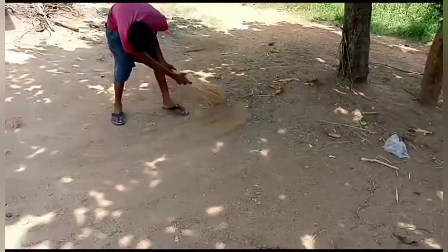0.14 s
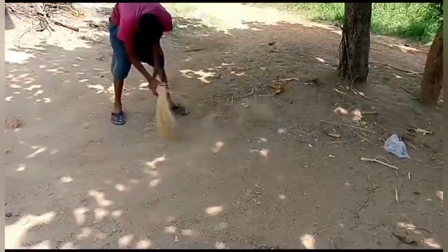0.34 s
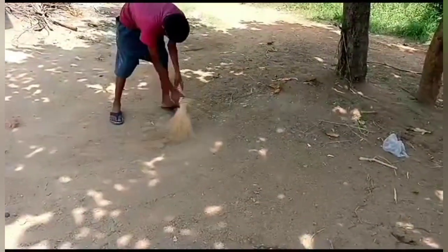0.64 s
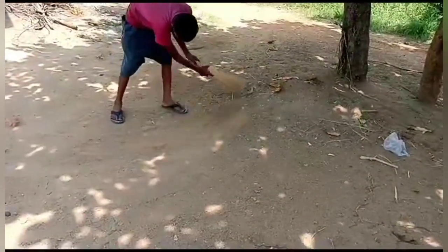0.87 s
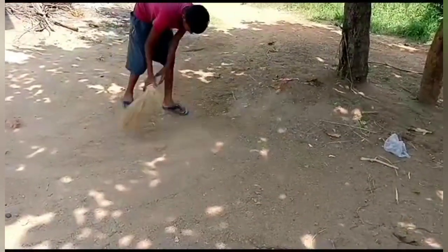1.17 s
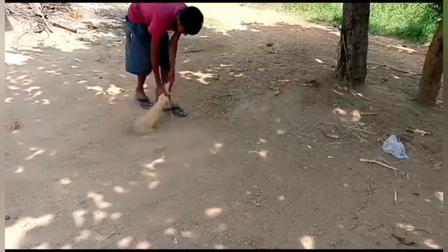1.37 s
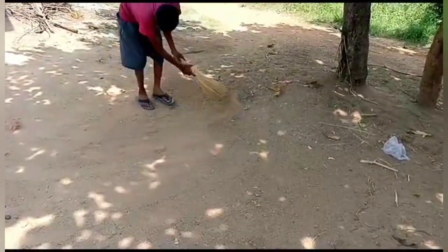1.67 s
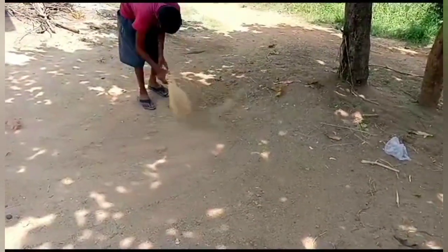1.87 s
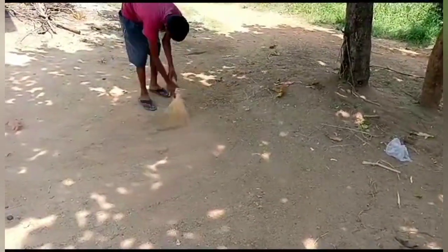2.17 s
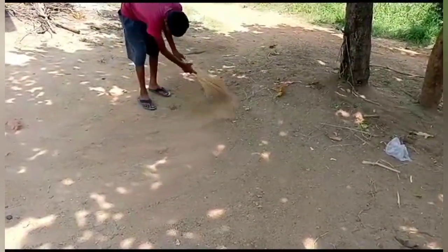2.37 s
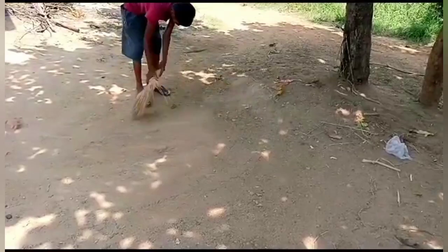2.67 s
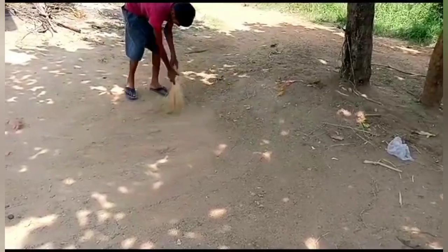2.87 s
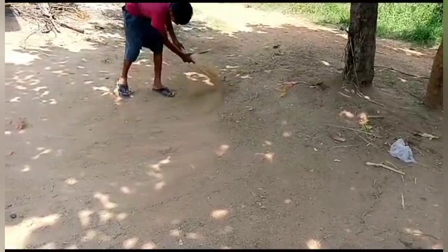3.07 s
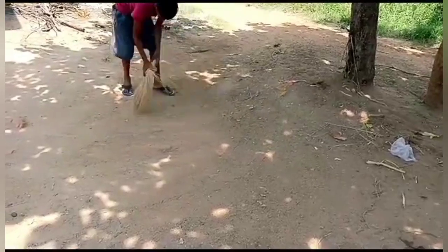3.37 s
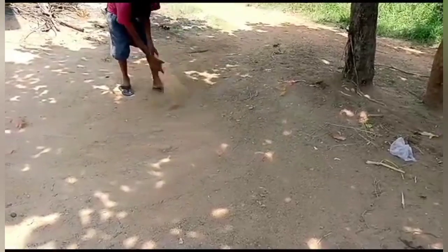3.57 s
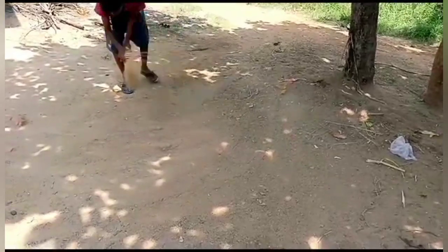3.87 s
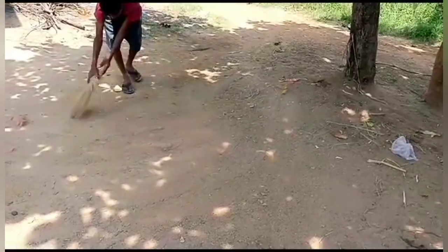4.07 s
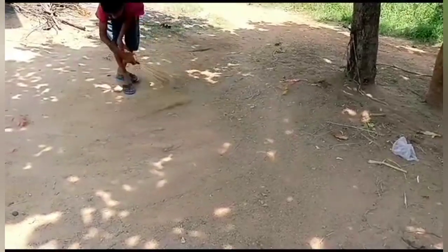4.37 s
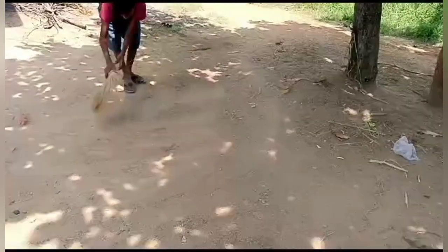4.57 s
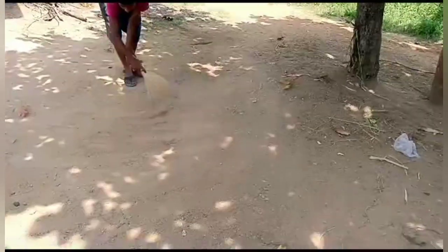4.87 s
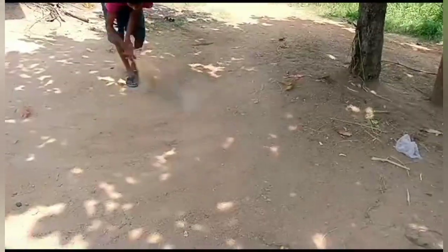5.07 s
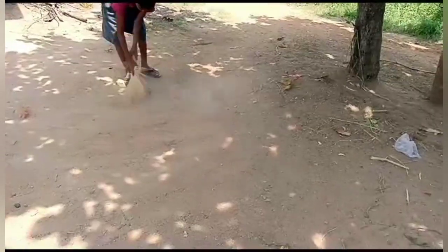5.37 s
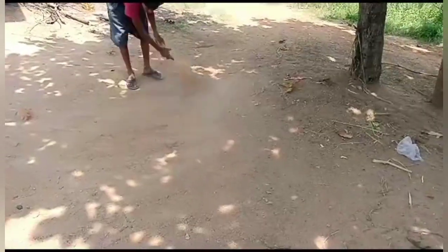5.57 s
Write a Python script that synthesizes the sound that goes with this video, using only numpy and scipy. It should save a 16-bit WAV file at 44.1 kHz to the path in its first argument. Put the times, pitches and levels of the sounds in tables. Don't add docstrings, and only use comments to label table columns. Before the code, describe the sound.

Repeated swishes of straw over gritty soil, each swelling quickly and flicking off faster, with a fizzy top. Short sandal crunches and dry ticks fall between them, starting with a sharp heel-and-twig crack. A wide, whistling cicada wall continues underneath, with barely audible low engine putter and soft coos. Open-air yard heard through a small stereo camera, which catches a couple of soft handling thumps.

```python
import sys
import numpy as np
from scipy import signal
from scipy.fft import rfft, irfft, next_fast_len
from scipy.io import wavfile
from scipy.ndimage import uniform_filter1d

SR = 44100
rng = np.random.default_rng(int(sys.argv[2]) if len(sys.argv) > 2 else 0)


def nominal_scale(level):
    x = np.asarray(level, float) / 20
    return 10 ** x


def master(y):
    cut = np.clip(np.atleast_2d(y).T, -1, 1)
    pcm = np.round(cut * 32767)
    wavfile.write(sys.argv[1], SR, pcm.astype(np.int16))


N = 252244
T = np.arange(N) / SR


def evened(x):
    return x / np.sqrt(np.mean(x ** 2) + 1e-20)


def read(points, hz):
    f, value = np.transpose(points)
    return np.interp(np.log(hz + 1), np.log(f + 1), value)


def filtered(x, gain_db):
    size = next_fast_len(N)
    gain = nominal_scale(gain_db(np.fft.rfftfreq(size, 1 / SR)))
    return irfft(rfft(x, size) * gain, size)[..., :N]


def colour(x, spectrum):
    return evened(filtered(x, lambda hz: read(spectrum, hz)))


def resonate(x, hz, width):
    turn = np.exp(2j * np.pi * np.cumsum(hz * np.ones(N)) / SR)
    r = np.exp(-np.pi * width / SR)
    return 2 * (turn * signal.lfilter([1 - r], [1, -r], x / turn)).real


def add(mix, s, sound):
    part = mix[round(s * SR):][:len(sound)]
    part += sound[:len(part)]


def smoothed(x, size0, size1):
    return uniform_filter1d(uniform_filter1d(x, size=size0, axis=0), size=size1, axis=1)


def gesture(s, held, rise_db, sag_db, fall_db, round_s):
    rise = rise_db * np.maximum(s - T, 0)
    sag = sag_db * np.clip(T - s, 0, held)
    fall = fall_db * np.maximum(T - s - held, 0)
    return nominal_scale(uniform_filter1d(-rise - sag - fall, max(int(round_s * SR), 1)))


def grit(per_s, spread_db):
    size = nominal_scale(spread_db * np.minimum(rng.exponential(1, (2, N)), 5))
    sign = rng.choice([-1, 1], (2, N))
    return evened(size * sign * (rng.random((2, N)) < per_s / SR))


def clumped(x, patchy_db):
    z = signal.stft(x, nperseg=256)[2]
    patches = evened(smoothed(rng.standard_normal(z.shape[1:]), 5, 8))
    return evened(signal.istft(z * nominal_scale(patchy_db * patches), nperseg=256)[1][:, :N])


def ports(x, left_db):
    return np.array([nominal_scale(left_db / 2) * np.roll(x, 16), nominal_scale(-left_db / 2) * x])


# full contact t/s, held t/s, scrape level/dB, tip fizz level/dB, low drag level/dB
STROKES = [
    (0.001, 0.01, -48, -50, -62.5),
    (0.643, 0.13, -40, -40, -67),
    (1.385, 0.14, -43.5, -42, -65.5),
    (2.14, .12, -44, -42, -74),
    (2.83, 0.14, -47.5, -43.5, -75),
    (3.48, 0.096, -44, -45.5, -76),
    (4.101, 0.16, -47.5, -43, -72),
    (4.69, .1, -57, -44, -77),
    (5.365, .13, -49, -41.5, -69),
]
# f/Hz, level/dB per Hz
SCRAPE_SPECTRUM = [(710, -62), (1200, -14.5), (1400, -6), (1500, -17), (1700, -10), (1960, -1.5),
                   (4200, 10.5), (5460, -18), (9240, -120)]
# f/Hz, level/dB per Hz
FIZZ_SPECTRUM = [(3500, -50), (5000, -31), (8000, -1), (10000, 3), (12000, 9), (14000, 9.5), (15500, 10),
                 (17000, -7)]
# f/Hz, level/dB per Hz
DRAG_SPECTRUM = [(300, -47), (600, -1.5), (900, -3.5), (1300, -3.5), (1800, 10), (2400, -7.5)]


def broom():
    scrape_gain, stem_gain, fizz_gain, drag_gain = np.zeros((4, N))
    tips_lead_s = 0.0068
    for s, held, scrape_db, fizz_db, drag_db in STROKES:
        scrape_gain += nominal_scale(scrape_db) * gesture(s, held, rise_db=137, sag_db=0, fall_db=257, round_s=0.064)
        stem_gain += nominal_scale(scrape_db) * gesture(s, held, rise_db=250, sag_db=0, fall_db=330, round_s=0.048)
        fizz_gain += nominal_scale(fizz_db) * gesture(s - tips_lead_s, held, rise_db=123, sag_db=21, fall_db=179, round_s=0.04)
        drag_gain += nominal_scale(drag_db) * gesture(s, held, rise_db=220, sag_db=0, fall_db=240, round_s=0.03)
    tips = grit(per_s=5000, spread_db=2.0)
    tips = clumped(tips + ports(tips[0], left_db=0) * 0.14, patchy_db=2.4)
    scrape = colour(tips, SCRAPE_SPECTRUM) * nominal_scale(1.5 + np.array([[1.5], [-1.5]]))
    fizz = colour(tips, FIZZ_SPECTRUM) * nominal_scale(2.0 + np.array([[1.2], [-1.2]]))
    drag = colour(tips, DRAG_SPECTRUM) * nominal_scale(7.0)
    stems = signal.sosfiltfilt(signal.butter(2, 2430, fs=SR, output="sos"), scrape)
    return scrape_gain * (scrape - stems) + stem_gain * stems + fizz_gain * fizz + drag_gain * drag


# t/s, held t/s, level/dB, hollow under the sole f/Hz, low drag over that level/dB
SCUFFS = [
    (0.181, 0.019, -51.5, 2200, -5),
    (.84, .02, -58, 2400, -11),
    (.9, 0.042, -51.5, 1880, -6.5),
    (1.285, 0.038, -61.5, 2100, -2.5),
    (1.945, 0.011, -55.5, 1290, -20),
    (2.05, 0.022, -79, 2300, 10),
    (2.541, 0.022, -53.5, 2250, -5),
    (3.285, 0.033, -55.5, 2070, -36),
    (4.324, 0.0067, -69.5, 2380, 13),
    (5.67, 0.02, -55.5, 2350, -21),
]
# t/s, held t/s, level/dB, hollow f/Hz, low drag over that level/dB
STAMPS = [
    (0.399, 0.0024, -32, 1970, 2.5),
    (.416, 0.0069, -61, 1850, -18),
    (0.981, 0.004, -48, 2700, -6),
    (2.503, .02, -53, 2380, -27),
    (3.994, 0.013, -56.5, 2470, -25),
]


def sandals():
    land_db_per_s, stamp_db_per_s = 459, 6000
    rows = sorted([(*r, land_db_per_s) for r in SCUFFS] + [(*r, stamp_db_per_s) for r in STAMPS])
    s, held, db, hollow_hz, drag_db, rise_db = np.transpose(rows)
    steps = np.array([gesture(a, b, c, sag_db=0, fall_db=354, round_s=0.001) for a, b, c in zip(s, held, rise_db)])
    gain = nominal_scale(db) @ steps
    drag_gain = nominal_scale(db + drag_db) @ steps
    hz = np.interp(T, s, hollow_hz)
    crunch, spare = grit(per_s=4000, spread_db=2.5)
    hollow = evened(resonate(resonate(crunch, hz, 550), hz, 1000))
    rasp = colour(crunch, [(800, -45), (1500, 25.0), (3500, -34.5), (5000, -39.0), (16000, 3)])
    drag_spectrum = [(200, -21), (400, 0), (700, 3.5), (1300, 11.5), (1800, -16)]
    drag, scattered_drag = colour(np.array([crunch, spare]), drag_spectrum)
    direct = ports(gain * (hollow + nominal_scale(-7.0) * rasp), left_db=7.0)
    direct += ports(drag_gain * drag, left_db=-1.0)
    return direct + nominal_scale(-10.0) * drag_gain * scattered_drag + gain * colour(spare, SCRAPE_SPECTRUM)


# t/s, peak level/dB, lower ring f/Hz, upper ring f/Hz, upper ring over peak level/dB
SNAPS = [(0.181, -33, 2330, 3560, 9), (0.3987, -7, 2000, 3570, -6), (0.4162, -28, 1910, 4160, 1),
         (0.7646, -22, 2600, 3990, 12.5), (0.984, -28, 2410, 4030, 7), (1.291, -43, 2080, 3150, 10),
         (1.945, -40, 2070, 3280, 4), (2.505, -37, 2500, 4066, -4), (2.53, -39, 2320, 3570, 13),
         (3.2755, -32, 1940, 3880, -4), (3.3413, -42, 2430, 3630, 14), (3.9956, -37, 2700, 3912, -10),
         (5.675, -36, 2320, 4159, 0)]


def twigs():
    out, t = np.zeros(N), T[:2000]
    for s, db, low_hz, high_hz, high_db in SNAPS:
        modes = np.sin(2 * np.pi * low_hz * t) + nominal_scale(high_db) * np.sin(2 * np.pi * high_hz * t)
        ring = np.tanh(t / 0.001) * nominal_scale(-60 * t / 0.012) * modes
        tick = nominal_scale(-16.5 - 60 * t / 0.0071) * np.diff(rng.standard_normal(len(t) + 1))
        knock = nominal_scale(-22.5 - 60 * t / 0.011) * np.sin(2 * np.pi * 520 * t)
        add(out, s - 0.001, nominal_scale(db) * (ring + tick + knock))
    return ports(out, left_db=4.5)


# t/s, peak level/dB, f/Hz
THUMPS = [
    (0.368, -45, 72.7),
    (0.685, -32, 121),
]


def camera_thumps():
    out, t = np.zeros(N), T[:1500]
    for s, db, hz in THUMPS:
        push = np.exp(-((t - 0.012) / 0.0058) ** 2)
        add(out, s, nominal_scale(db) * np.sin(2 * np.pi * hz * t) * push)
    return out * nominal_scale(np.array([[-9.0], [4.0]]))


# f/Hz, likeness (1 = the same)
LIKENESS = [(30, 0.25), (130, 0.22), (300, 1), (640, 0.1), (1400, 0.03), (4000, 0.11), (16000, 0.12)]


def field(spectrum, patchy_db, ripple_db):
    frames, hz = N // 256 + 5, np.fft.rfftfreq(1024, 1 / SR)
    a, b, c, d, patches = rng.standard_normal((5, 513, frames))
    patches = evened(smoothed(patches, 8, 10))
    same = np.clip(read(LIKENESS, hz), -1, 1)[:, None]
    left = a + 1j * b
    right = same * left + np.sqrt(1 - same ** 2) * (c + 1j * d)
    fine_db = ripple_db * rng.standard_normal((2, 513))
    gain = nominal_scale((read(spectrum, hz) + fine_db)[..., None] + patchy_db * patches)
    z = np.array([left, right]) * gain
    return evened(signal.istft(z, nperseg=1024, noverlap=768)[1][:, :N])


# f/Hz, left over right level/dB
BODY_SHADE = [(60, -2), (200, -1), (900, 0), (1900, 5), (2900, 3), (3950, 11), (4900, 5.5), (5700, 0),
              (6400, 2), (7100, -10), (8700, -1.5), (9900, 5.5), (13500, 10.5), (15300, 11.5)]


def lean(x):
    return filtered(x, lambda hz: read(BODY_SHADE, hz) * np.array([[0.5], [-0.5]]))


# f/Hz, level/dB per Hz
CHORUS_SPECTRUM = [(2000, -86), (3400, -50.5), (3690, -40.5), (4190, -24), (4430, -23.5), (4550, -16),
                   (4630, -12), (4810, -9.5), (4920, -3), (5030, 1), (5680, -2), (6470, -15), (7790, -17.5),
                   (8800, -24.5), (9600, -56), (12500, -72), (21100, -120)]
# f/Hz, level/dB per Hz
SHIMMER_SPECTRUM = [(5180, -22.5), (8800, -7), (9440, 0.5), (11800, -1), (13200, -7.5), (13900, -11),
                    (15100, 0), (15600, -3.5), (16000, -39.5)]
# f/Hz, width f/Hz, level/dB
SINGERS = [(4990, 73, -13.5), (5510, 43, -8.5), (5694, 17.5, -12), (4800, 15.3, -16.5), (6890, 36, -24.5),
           (8720, 51, -28), (15160, 300, -41)]
# t/s, level/dB, left over right level/dB
DRONE = [
    (0, -28, 2.5),
    (.7, -28, 2),
    (2.2, -28, -0.1),
    (3.5, -28.5, 0.5),
    (4.5, -28.5, 0.5),
    (5.2, -29, -1.5),
    (5.72, -28.5, -1),
]


def cicadas():
    s, *columns = np.transpose(DRONE)
    db, left_db = (np.interp(T, s, c) for c in columns)
    near = np.zeros((2, N))
    for hz, width, singer_db in SINGERS:
        whistle = resonate(resonate(rng.standard_normal((2, N)), hz, width), hz, width)
        near += nominal_scale(singer_db) * evened(whistle)
    wall = field(CHORUS_SPECTRUM, patchy_db=1.0, ripple_db=1.7) + near
    shimmer = nominal_scale(-48.5) * field(SHIMMER_SPECTRUM, patchy_db=2.0, ripple_db=2.4)
    return lean(nominal_scale(db + 1.5 + np.array([left_db, -left_db]) / 2) * wall + shimmer)


# t/s, level/dB
ENGINE_DRIFT = [(.8, -73), (1.2, -68.5), (1.45, -54.5), (2.03, -55.5), (2.3, -64.5), (2.45, -53.5),
                (2.7, -66), (2.88, -53.5), (3.08, -61), (3.2, -51.5), (3.45, -55), (3.65, -55),
                (3.85, -54.5), (4.15, -52.5), (4.4, -62), (4.6, -59), (5.3, -63), (5.45, -54.5)]
# t/s, depth level/dB
MISSES = [(1.1, -1), (1.34, 29), (1.59, 9), (1.82, 9), (1.91, 6), (2.09, 9), (2.36, 10), (2.44, 9),
          (2.62, 1), (2.72, 21), (3.33, 14), (3.7, 20), (3.83, 16), (3.94, 25), (4.09, 8), (4.41, 5),
          (4.69, 29), (4.89, 24), (5.03, 19), (5.36, 2), (5.61, 30)]
# f/Hz, level of an order there/dB
PIPE = [(40, -26), (80, -6.5), (108, -4), (135, 2), (162, 7), (190, -2), (240, -26.5), (335, -16.5),
        (420, -45)]


def engine():
    step = 16
    t, orders = T[::step], np.arange(2, 16)[:, None]
    db = np.interp(t, *np.transpose(ENGINE_DRIFT))
    for s, depth_db in MISSES:
        db = db - depth_db * np.exp(-((t - s) / 0.022) ** 2)
    firings_per_s = 26.7 + 0.14 * t
    turns = np.cumsum(firings_per_s) * step / SR
    waver = evened(uniform_filter1d(uniform_filter1d(rng.standard_normal((3, len(orders), len(t))), 120), 120))
    apart = 0.42 * waver[2] * np.array([1, -1])[:, None, None]
    phase = 2 * np.pi * orders * turns + 0.63 * waver[1] + apart
    lines = nominal_scale(read(PIPE, 27 * orders) + 4.45 * waver[0]) * np.cos(phase)
    return signal.resample_poly(nominal_scale(db) * evened(lines.sum(1)), step, 1, axis=1)[:, :N]


# t/s, length t/s, level/dB, start f/Hz, end f/Hz
COOS = [
    (.28, 0.11, -54, 326, 348),
    (1.04, 0.065, -60.5, 341.5, 340),
    (3.32, 0.084, -62, 345, 327),
    (4.54, 0.077, -67, 520.5, 510),
    (4.63, 0.099, -64, 498, 484),
    (4.71, .07, -66, 496, 490),
    (4.81, 0.1, -54.5, 338, 321),
    (5.17, 0.063, -62.5, 325.5, 321.8),
]


def dove():
    out = np.zeros(N)
    for s, length, db, start_hz, end_hz in COOS:
        hz = np.linspace(start_hz, end_hz, round(length * SR))
        add(out, s, nominal_scale(db) * np.hanning(len(hz)) * np.sin(2 * np.pi * np.cumsum(hz) / SR))
    return out


# f/Hz, level/dB per Hz
AIR_SPECTRUM = [(12, -58), (20, -23), (43, -46), (93, -11.5), (172, -12), (259, -11.5), (340, -17),
                (535, -23), (986, -28.5), (1130, -35.5), (2130, -19.5), (3280, -21.5), (3670, -53),
                (3930, -25), (4500, -8), (5850, -35.5), (9900, -120)]


def yard_air():
    return nominal_scale(-61.5) * lean(field(AIR_SPECTRUM, patchy_db=4.5, ripple_db=4.0))


def scene():
    near = broom() + sandals() + twigs() + camera_thumps()
    return near + cicadas() + engine() + dove() + yard_air()


def roll_off(x):
    return signal.sosfilt(signal.butter(12, 17030, fs=SR, output="sos"), x)


def record(dry):
    lowpass = signal.firwin(511, 15950, window=("kaiser", 9), fs=SR)
    limited = signal.oaconvolve(dry, lowpass[None], "same")
    return roll_off(limited)


dry = scene()
out = record(dry)
master(out)
```